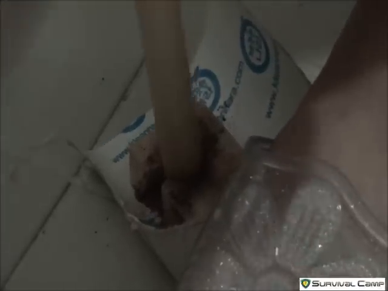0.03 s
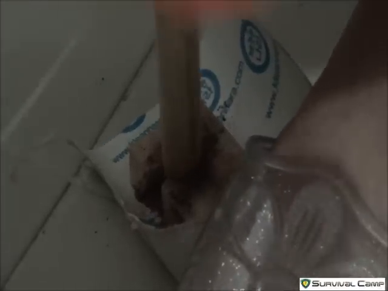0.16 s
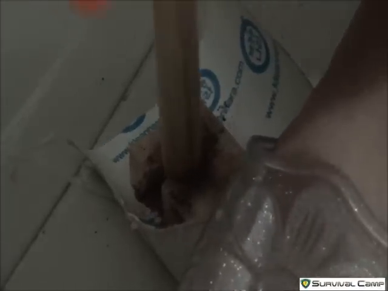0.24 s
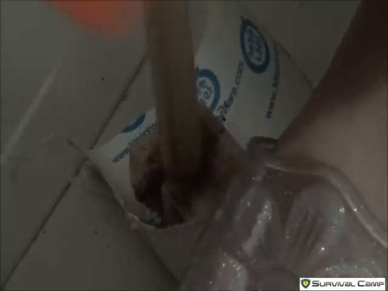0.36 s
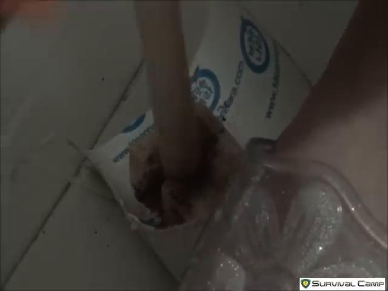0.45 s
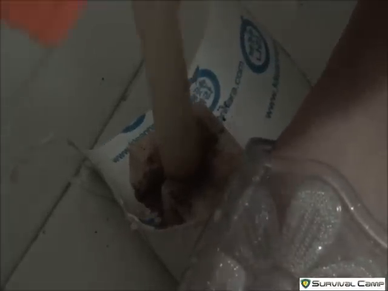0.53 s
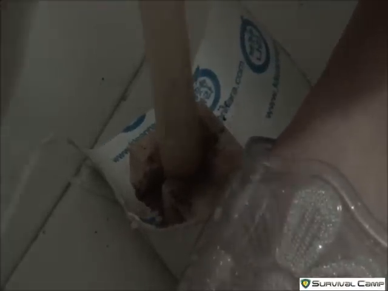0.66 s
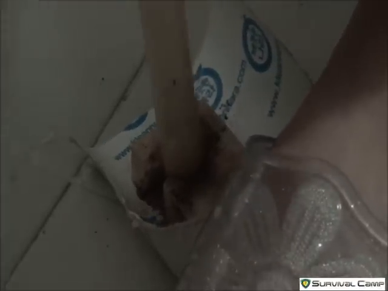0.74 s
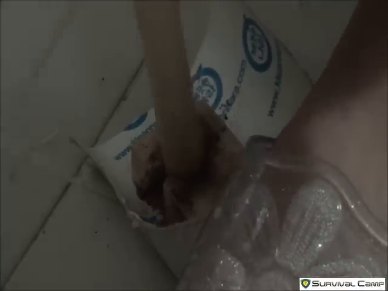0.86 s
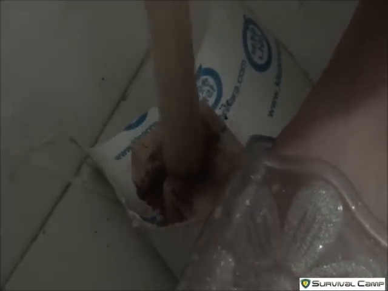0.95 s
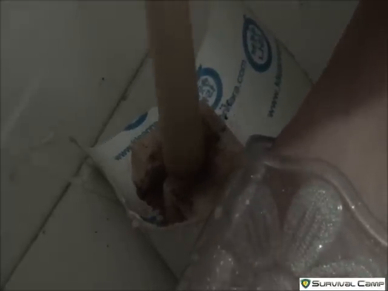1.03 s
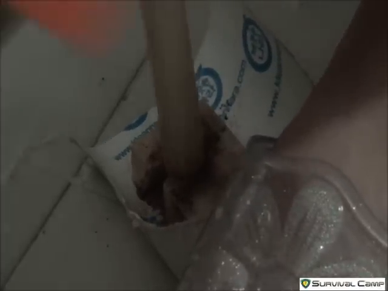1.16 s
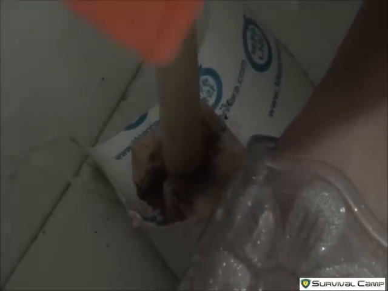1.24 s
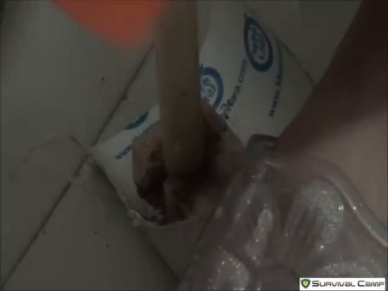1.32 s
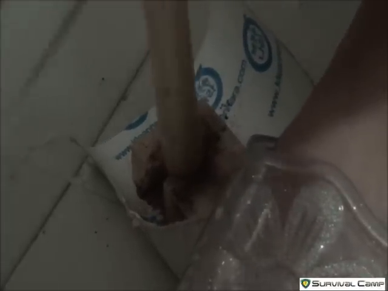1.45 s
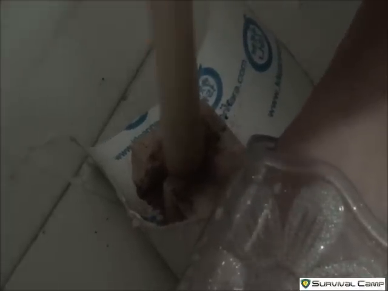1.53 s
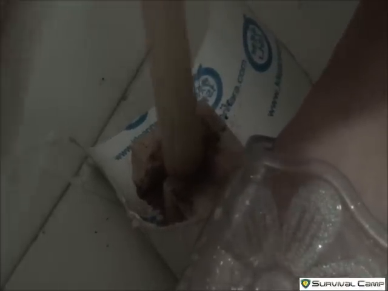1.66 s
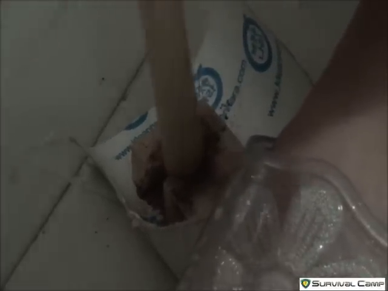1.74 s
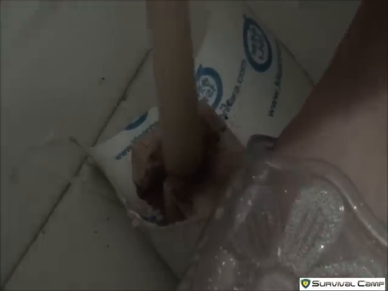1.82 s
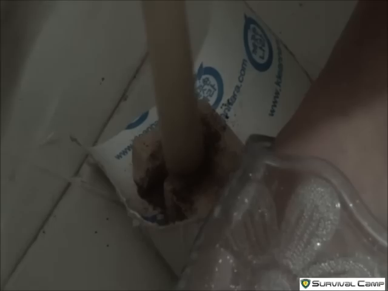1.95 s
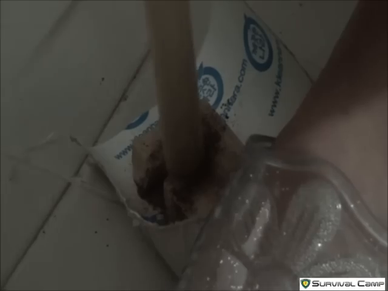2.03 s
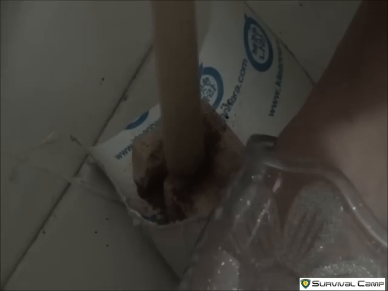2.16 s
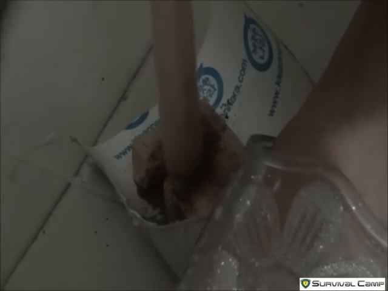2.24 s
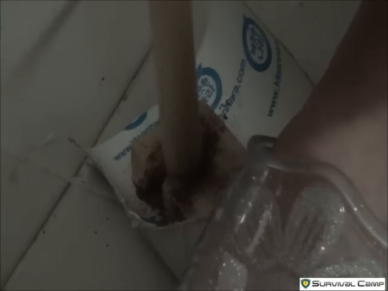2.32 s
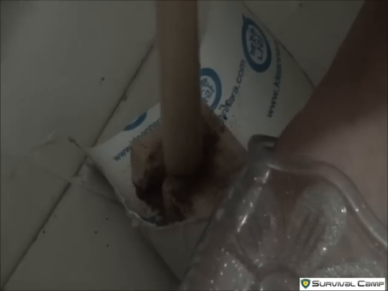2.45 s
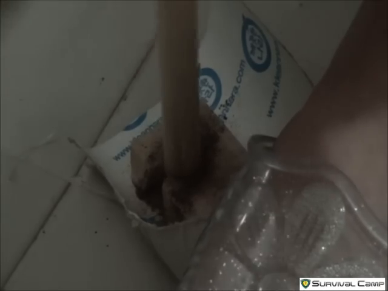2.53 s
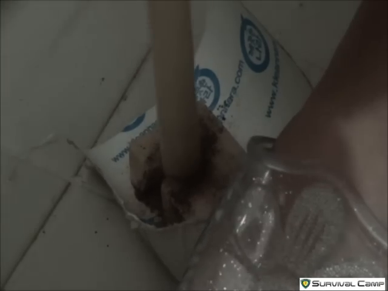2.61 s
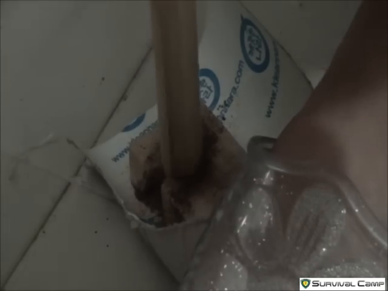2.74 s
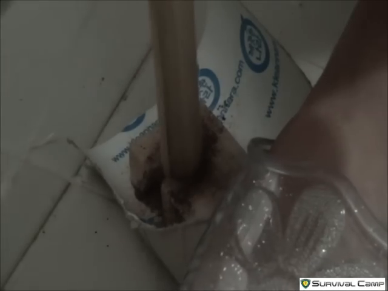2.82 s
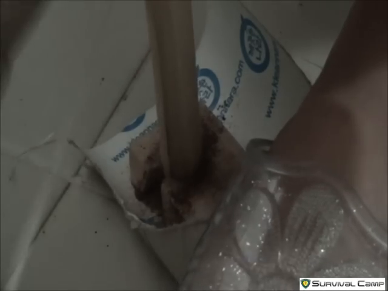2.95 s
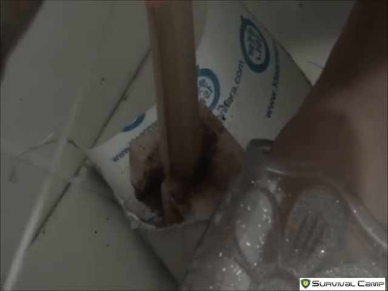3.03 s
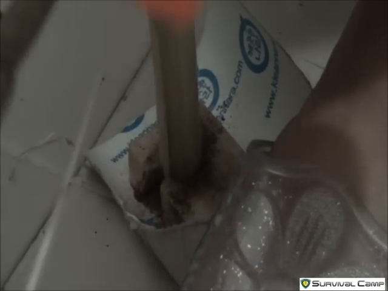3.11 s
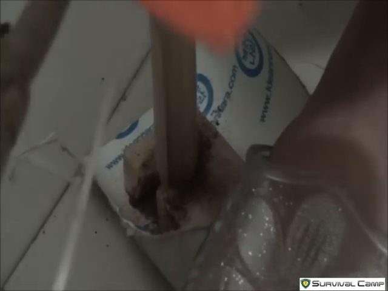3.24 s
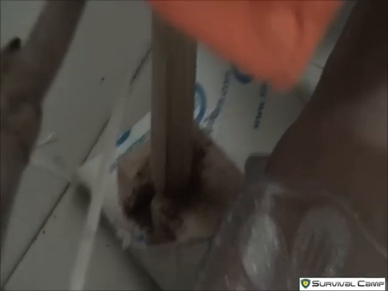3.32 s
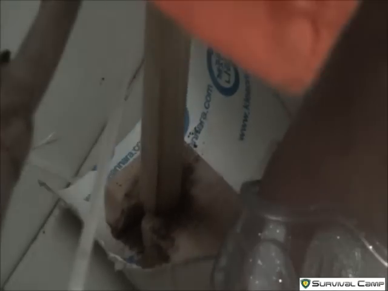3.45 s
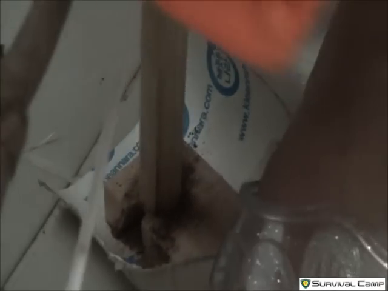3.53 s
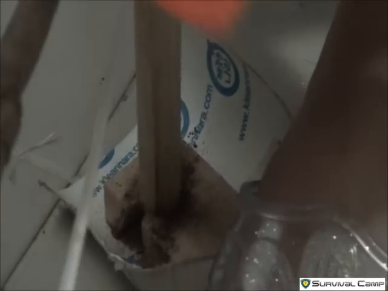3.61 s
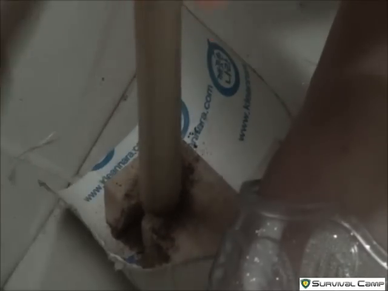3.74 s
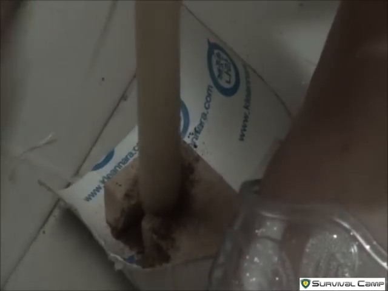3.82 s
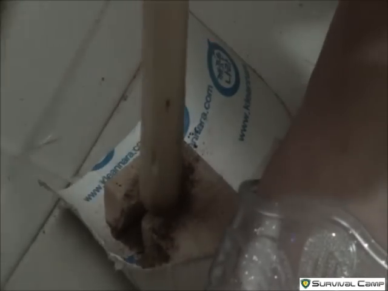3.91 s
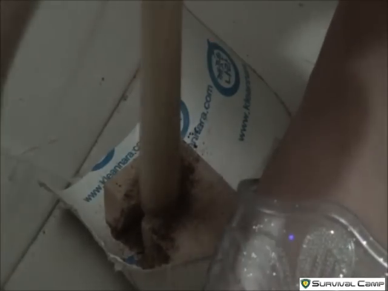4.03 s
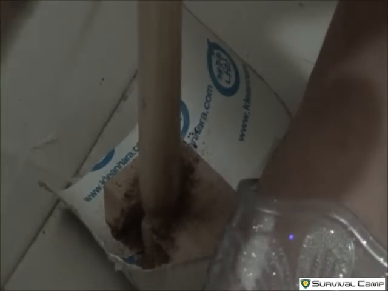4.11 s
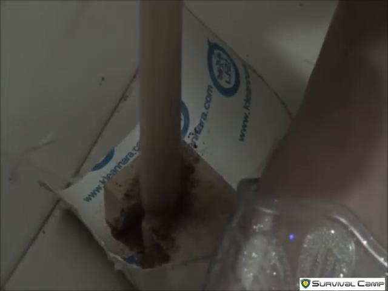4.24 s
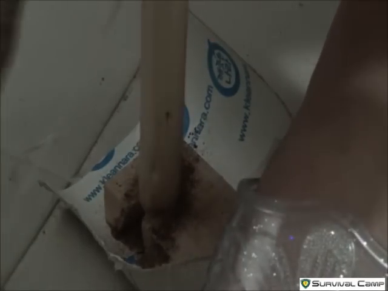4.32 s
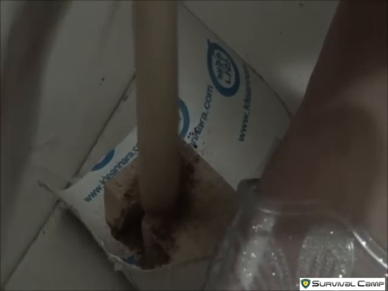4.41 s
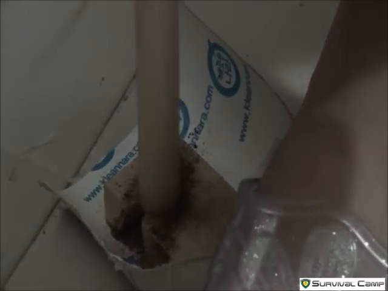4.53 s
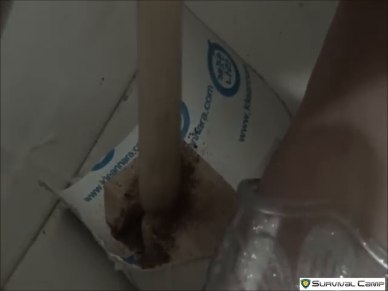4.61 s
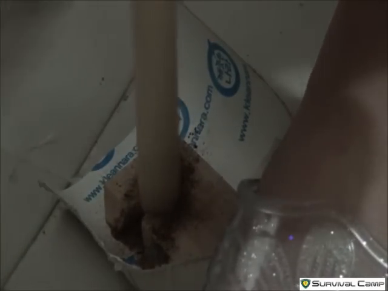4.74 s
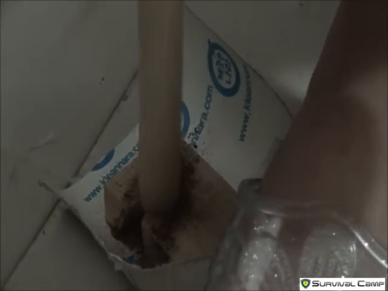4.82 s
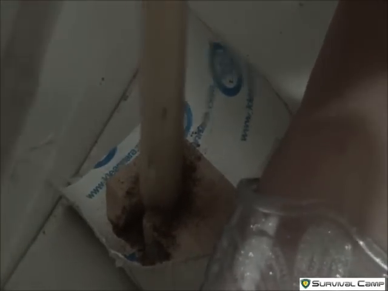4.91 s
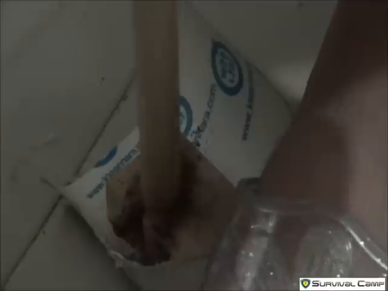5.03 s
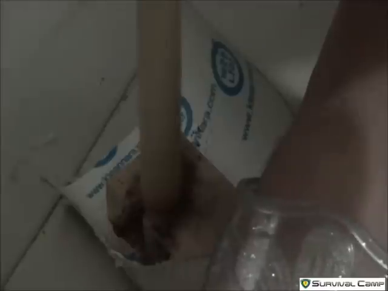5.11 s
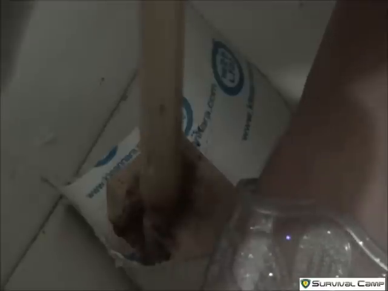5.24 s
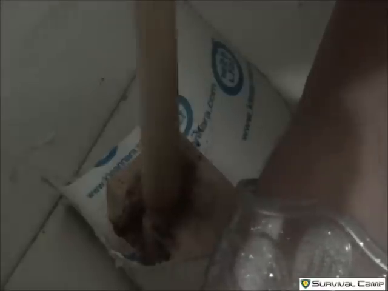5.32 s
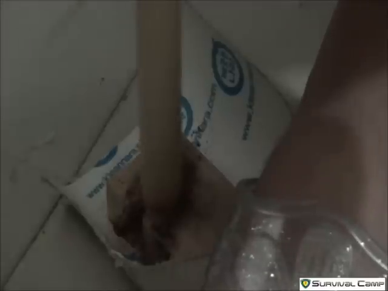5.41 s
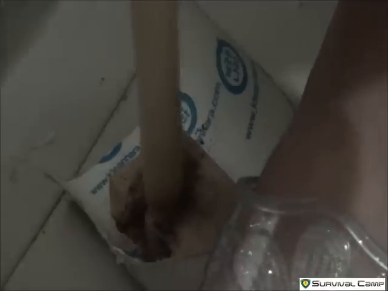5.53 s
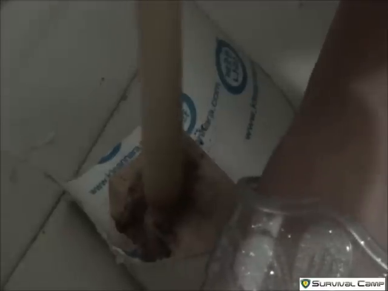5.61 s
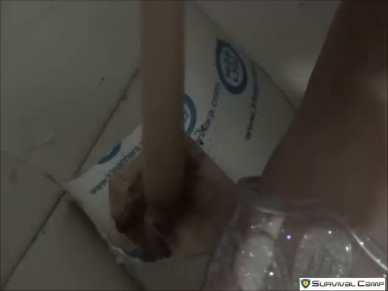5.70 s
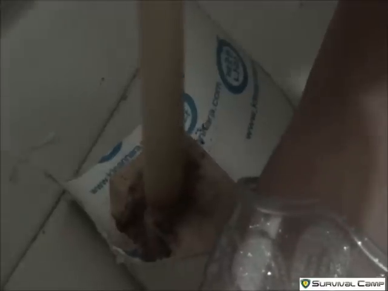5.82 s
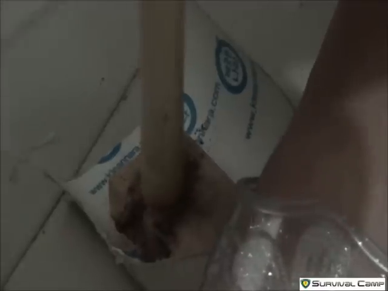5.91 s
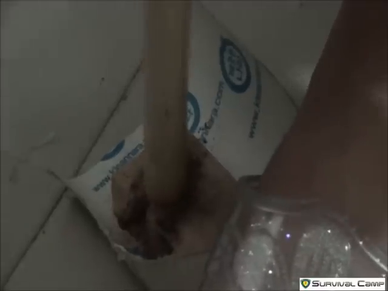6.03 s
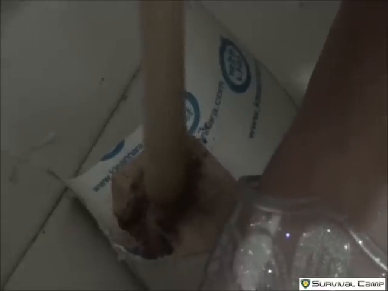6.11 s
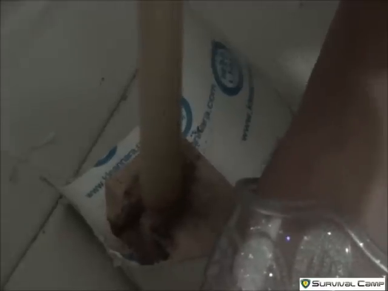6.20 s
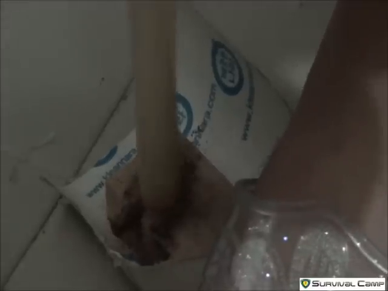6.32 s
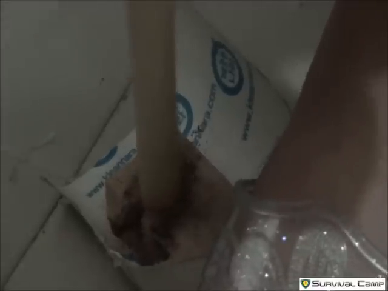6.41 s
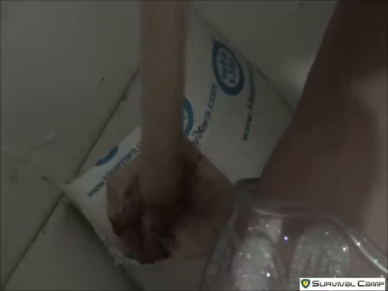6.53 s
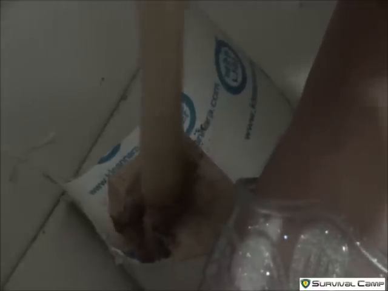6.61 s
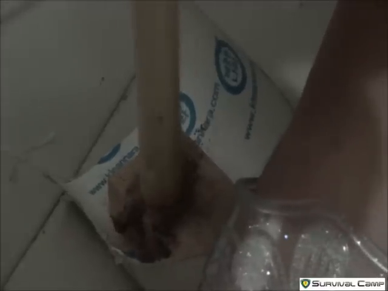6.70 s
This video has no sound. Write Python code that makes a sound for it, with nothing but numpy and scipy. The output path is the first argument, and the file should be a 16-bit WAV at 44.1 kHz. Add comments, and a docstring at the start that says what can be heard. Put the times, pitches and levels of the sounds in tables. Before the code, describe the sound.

Fast bow-drill friction, bright and squeaky-scratchy at first, with alternating push and pull strokes. After roughly a second's rest with faint taps, sharp cracks and a thud restart the sawing, now rougher and woodier, with stronger floor knocks toward the end. Recorded close in stereo, with short reflections from hard walls and faint steady room air.

```python
"""Gritty strokes rasp to and fro, about seven a second with a pause midway, over thuds, creaks and bright snaps.
A bow drill is sawn on a tiled floor: at each stroke the spindle spins up in its socket, rasps and stops.
Grain noise drives hiss, rasp and ringing; pushes ring the spindle harder than pulls, and the rasp grows coarser.
Noise and blows excite the hearth board's modes, gliding sines make the cord creak, noise bursts make the snaps.
A small hard room answers with early echoes and a decaying noise tail, over still air made of coloured noise."""
import sys
import numpy as np
from scipy import signal
from scipy.fft import rfft, irfft, next_fast_len
from scipy.io import wavfile
from scipy.ndimage import uniform_filter1d, map_coordinates

SR = 44100
rng = np.random.default_rng(int(sys.argv[2]) if len(sys.argv) > 2 else 0)


def store_pcm(level_fs):
    """Save levels as 16-bit WAV."""
    pcm = np.round(np.clip(level_fs, -1, 1) * 32767).astype(np.int16)
    wavfile.write(sys.argv[1], SR, np.atleast_2d(pcm).T)


N = 298116  # length in samples

# Levels in the tables are relative: each layer is balanced again in the mix.
# bow strokes: [start/s, end/s, level/dB, direction "push" or "pull"]
BOW_STROKES = [(-0.019, 0.069, -23, "push"), (0.214, 0.39, -40.5, "pull"), (0.399, 0.573, -25, "push"),
               (0.562, 0.721, -23, "pull"), (0.743, 0.892, -19.5, "push"), (0.873, 1.08, -23.5, "pull"),
               (1.06, 1.193, -22.5, "push"), (1.186, 1.362, -23, "pull"), (1.348, 1.504, -19.5, "push"),
               (1.473, 1.667, -20, "pull"), (1.657, 1.791, -19.5, "push"), (1.792, 1.95, -20.5, "pull"),
               (1.946, 2.07, -18, "push"), (2.07, 2.251, -22.5, "pull"), (2.236, 2.386, -20.5, "push"),
               (2.395, 2.534, -23.5, "pull"), (2.582, 2.715, -24.5, "push"), (3.11, 3.292, -52.5, "pull"),
               (3.269, 3.508, -44.5, "push"), (3.723, 3.948, -21.5, "pull"), (3.92, 4.11, -25, "push"),
               (4.21, 4.379, -24, "pull"), (4.357, 4.529, -20.5, "push"), (4.522, 4.694, -20.5, "pull"),
               (4.684, 4.812, -19.5, "push"), (4.804, 4.948, -19.5, "pull"), (4.949, 5.089, -19, "push"),
               (5.081, 5.211, -16.5, "pull"), (5.228, 5.364, -18.5, "push"), (5.356, 5.478, -18.5, "pull"),
               (5.51, 5.648, -20, "push"), (5.629, 5.77, -18, "pull"), (5.776, 5.912, -19, "push"),
               (5.895, 6.027, -17.5, "pull"), (6.055, 6.186, -18.5, "push"), (6.175, 6.323, -19, "pull"),
               (6.305, 6.473, -20.5, "push"), (6.466, 6.591, -18, "pull"), (6.597, 6.76, -22, "push")]
# how coarse the rasp is, how alike pushes and pulls ring, how much the board joins in: [t/s, coarseness/0-1]
COARSENESS = [(0, 0.02), (1.0, 0.07), (2.3, 0.62), (3.8, 0.84), (4.6, 0.72), (6.76, 0.97)]
# the board knocks on the floor, mostly late in a pull: [t/s, blow level/dB, level of rumble left behind/dB]
FLOOR_KNOCKS = [(0.692, -26, -52), (1.44, -25, -57), (1.586, -23.5, -50), (2.17, -26, -52),
                (2.498, -21, -57), (3.878, -12, -40), (4.325, -21, -45), (4.918, -16, -26),
                (5.17, -22, -44), (5.457, -14, -25.5), (5.747, -20, -22.5), (6.006, -9, -26.5),
                (6.346, -20.5, -45), (6.571, -8.5, -25)]
# resonances of the board when it knocks: [f/Hz, bandwidth/Hz, level/dB]
KNOCK_MODES = [(87, 5, -17), (168, 12, 0.5), (337, 120, -7), (480, 65, -1.5), (636, 91, 2), (789, 130, 1),
               (1410, 320, -10)]


def amp(db):
    """Decibels to gain."""
    return 10 ** (np.asarray(db) / 20)


def unit(x):
    """Scale to rms 1."""
    return x / np.sqrt(np.mean(x ** 2) + 1e-20)


def along(points, hz):
    """Read (Hz, value) points on a log frequency axis."""
    f, values = np.transpose(points)
    return np.interp(np.log(hz + 1), np.log(f + 1), values)


def wobble(rate):
    """A smooth random curve through `rate` random knots a second."""
    knots = rng.standard_normal(int(N * rate / SR) + 4)
    return map_coordinates(knots, [np.arange(N) * rate / SR])


def filtered(x, response):
    """Multiply the spectrum of x by a response given as a function of Hz."""
    m = next_fast_len(N + SR // 2)
    hz = np.fft.rfftfreq(m, 1 / SR)
    return irfft(rfft(x, m) * response(hz), m)[..., :N]


def coloured(x, spectrum):
    """Pass x through a smooth (Hz, dB) spectrum."""
    return filtered(x, lambda hz: amp(along(spectrum, hz)))


def rung(x, modes):
    """Ring a body's resonances with x; neighbouring modes swing in opposite senses."""
    def response(hz):
        total = 0
        for k, (centre, width, db) in enumerate(modes):
            damping = 1j * hz * width
            total = total + (-1) ** k * amp(db) * damping / (centre * centre - hz * hz + damping)
        return total
    return filtered(x, response)


def add(track, s, sound):
    """Mix a short sound into a track at time s."""
    part = track[max(round(s * SR), 0):][:len(sound)]
    part += sound[:len(part)]


def bursts(events, t60):
    """A noise burst for each (s, dB) row, falling 60 dB in t60 seconds."""
    out, t = np.zeros(N), np.arange(SR // 20) / SR
    for s, db, *_ in events:
        add(out, s, amp(db - 60 * t / t60) * rng.uniform(-1.12, 1, len(t)))
    return out


def arch(length):
    """Half a sine, rising and falling over length seconds."""
    return np.sin(np.linspace(0, np.pi, int(length * SR)))


def shudder(rise, t60):
    """An envelope that swells quickly and dies away; both times in seconds."""
    t = np.arange(SR) / SR
    return (1 - np.exp(-t / rise)) * amp(-60 * t / t60)


def coarseness_at(s):
    """Coarseness at time s, read between the table's points."""
    return np.interp(s, *np.transpose(COARSENESS))


def spread(pair, width, side_db):
    """Two unrelated signals become mid and side: a diffuse field at closely spaced microphones."""
    side = amp(side_db) * coloured(pair[1], width)
    return np.array([pair[0] + side, pair[0] - side])


def from_right(x, lag):
    """A sound from the right reaches the left microphone lag seconds later."""
    ears = np.array([[-1], [1]])
    return filtered(x, lambda hz: np.exp(1j * np.pi * hz * lag * ears))


def still_air():
    """Steady air noise, weighted to the lows and widest in the middle of the spectrum."""
    # colour of the air: [f/Hz, level/dB]
    air_colour = [(20, -17), (35, -4), (55, -9.5), (140, -16.5), (215, -4), (290, -0.5), (350, -7.5),
                  (400, -11.5), (700, -6.5), (1100, -10), (1600, -15), (2600, -24.5), (5000, -29),
                  (15500, -35.5)]
    # stereo width of the air: [f/Hz, side minus mid/dB]
    air_width = [(60, -36), (250, -25), (1600, -9.5), (5000, -5), (15000, -29.5)]
    noise = unit(coloured(rng.standard_normal((2, N)), air_colour))
    return amp(-46.5) * spread(noise, air_width, side_db=-1.5)


def room(x, early_db, tail_db, side_db, early_t60=0.019, count=20):
    """Floor and nearby things answer at once; the walls ring on, their paths changing as the arm moves."""
    # decay of the walls: [f/Hz, t60/s]
    wall_decay = [(100, 0.22), (700, 1.03), (4000, 0.81), (9000, 0.33), (15000, 0.47)]
    # stereo width of the echoes: [f/Hz, side minus mid/dB]
    echo_width = [(60, -16), (250, -6), (600, -6), (2500, -7), (5000, -5), (8000, -8.5), (10500, -24),
                  (13000, -41)]
    t = np.arange(SR // 10) / SR
    early = rng.standard_normal((2, SR // 10)) * amp(-60 * t / early_t60)
    early /= np.linalg.norm(early[0])
    x = np.pad(x, (SR // 500, 0))  # echoes start 2 ms late
    wet = amp(early_db) * signal.fftconvolve(x[None], early, axes=1)[:, :N]
    # overlapping pieces of the sound each meet a fresh tail
    hop = N // count
    padded = np.pad(x, (hop, 2 * hop))
    for start in range(-hop, N, hop):
        piece = padded[start + hop:][:2 * hop] * np.hanning(2 * hop)
        hz, t, z = signal.stft(rng.standard_normal((2, SR // 2)), SR, nperseg=256)
        decay = amp(-60 * t / along(wall_decay, hz)[:, None])
        tail = signal.istft(z * decay, SR, nperseg=256)[1]
        for track, walls in zip(wet, tail):
            answer = signal.fftconvolve(piece, walls / np.linalg.norm(walls))
            add(track, start / SR, amp(tail_db) * answer[max(-start, 0):])
    return spread(wet, echo_width, side_db)


def creaks(rough=0.1):
    """The loaded cord slips at an uneven, gliding rate: sines with a jittered pitch and level."""
    # creaks of the cord: [t/s, length/s, start f/Hz, end f/Hz, level/dB]
    cord_creaks = [(1.72, .16, 940, 820, -38), (4.31, .16, 880, 1020, -41), (4.812, .09, 1080, 770, -32),
                   (5.068, .07, 800, 790, -33.5)]
    out, unsteady = np.zeros(N), 1 + rough * wobble(400)
    for s, length, start_hz, end_hz, db in cord_creaks:
        u = np.linspace(0, 1, int(length * SR))
        glide = start_hz + (end_hz - start_hz) * u
        rate = glide * unsteady[int(s * SR):][:len(u)]
        tone = np.sin(2 * np.pi * np.cumsum(rate) / SR)
        add(out, s, amp(db + 1.5) * np.sin(np.pi * u) * tone)
    return out * unit(amp(6.7 * wobble(250)))


def snaps():
    """Cord and splinters crack bright and dry; the loose bow taps the spindle more dully."""
    # snaps of cord and splinters: [t/s, level/dB]
    crack_times = [(0.8301, -14), (2.7, -17), (3.338, -28), (3.418, -18.5), (3.879, -6), (4.2097, -6),
                   (4.2127, -6), (4.3438, -9.5), (6.345, -6)]
    # taps of the bow while the hands rest: [t/s, level/dB]
    bow_taps = [(2.863, -32.5), (2.878, -59.5), (3.333, -26.5), (3.643, -39), (3.656, -38)]
    crack_colour = [(300, -25), (2000, -11), (6500, -2.0), (10000, 1.5), (13000, -21)]
    tap_colour = [(200, -5), (1000, 6), (3000, -1), (6000, -6.5), (13000, -17)]
    cracks = coloured(bursts(crack_times, t60=0.0046), crack_colour)
    taps = coloured(bursts(bow_taps, t60=0.045), tap_colour)
    return amp(5.5) * cracks + amp(6.0) * taps


def rattle(lumpy_db=4):
    """After each knock the board chatters unevenly on the floor, in the same damped modes."""
    strength = np.zeros(N)
    for s, db, _ in FLOOR_KNOCKS:
        add(strength, s, amp(db - 13) * shudder(rise=0.0064, t60=0.26))
    contacts = rng.standard_normal(N) * amp(lumpy_db * np.tanh(wobble(150)))
    chatter = coloured(contacts, [(80, -8), (220, 4), (900, -1), (2500, -2)])
    return strength * unit(rung(chatter, KNOCK_MODES))


def knocks(contact=0.00039):
    """Blows of the board on the floor: a push of brief contact (s) rings damped low modes under a dry clack."""
    blows, u = np.zeros(N), np.arange(SR // 50) / SR / contact
    push = u * np.exp(-2 * u)
    for s, db, _ in FLOOR_KNOCKS:
        add(blows, s, amp(db + 32.5) * push / push.sum())
    clack_colour = [(100, -18), (400, 4.5), (850, 0), (1700, -2.0), (3000, -15), (9000, -45)]
    clack = coloured(bursts(FLOOR_KNOCKS, t60=0.042), clack_colour)
    return rung(blows, KNOCK_MODES) + amp(10) * clack


def shaking():
    """Strength of the board's rumble and body: follows the strokes, rocks at times, settles after knocks."""
    # the board rocks softly on the floor: [t/s, length/s, level/dB]
    soft_rocks = [(.66, 0.1, -46), (1.06, 0.1, -40), (1.26, 0.12, -48), (1.435, .08, -50),
                  (1.582, 0.059, -44), (1.76, 0.11, -35), (1.857, 0.14, -38.5), (2.15, 0.15, -46),
                  (2.327, 0.086, -44), (4.28, .18, -40.5), (5.14, 0.1, -44), (5.6, 0.086, -48),
                  (6.252, 0.13, -36)]
    lag_s = 0.036  # the board shakes a little after the spindle
    rumble_db, rumble_coarse_db = -28, 3  # low rumble against the stroke, and its gain at coarseness 1
    body_db, body_coarse_db = -16.5, 2  # the same for the woody body
    rumble, body = np.zeros((2, N))
    for start, end, db, _ in BOW_STROKES:
        coarse, shape = coarseness_at(start), arch(end - start)
        add(rumble, start + lag_s, amp(db + rumble_db + rumble_coarse_db * coarse) * shape)
        add(body, start + lag_s, amp(db + body_db + body_coarse_db * coarse) * shape)
    for s, length, db in soft_rocks:
        add(rumble, s, amp(db) * arch(length))
    for s, _, left_db in FLOOR_KNOCKS:
        add(rumble, s, amp(left_db) * shudder(rise=0.02, t60=0.34))
    return rumble, body


def board():
    """The wobbling spindle shakes the hearth board on the floor: smooth noise for rumble, lumpy for body."""
    # low rumble and woody body resonances: [f/Hz, bandwidth/Hz, level/dB]
    low_modes = [(85, 10, 0), (154.5, 10, -1), (218, 40, -11.5)]
    body_modes = [(227, 49, -10.5), (340, 27, -5.5), (418, 44, -4), (647.5, 42, 3.5), (780, 74, -4.5),
                  (910, 360, -9)]
    rumble, body = shaking()
    rocking = coloured(rng.standard_normal(N), [(30, -7), (62, -8), (80, -1), (250, 0), (700, -15)])
    judder = rng.standard_normal(N) * amp(7.9 * np.tanh(wobble(120)))
    chatter = coloured(judder, [(60, -20), (200, -3.5), (1000, -10), (3000, 9), (9000, -40)])
    return rumble * unit(rung(rocking, low_modes)) + amp(-3.5) * body * unit(rung(chatter, body_modes))


def grit(spiky_db):
    """Countless tiny fractures of unequal size, up to the size of one fibre: noise with a bounded random level."""
    return unit(rng.standard_normal(N) * amp(spiky_db * np.tanh(wobble(3000))))


def bowing(steepness):
    """Strength of hiss, rasp, bite and edge: each stroke speeds up, peaks and stops."""
    fastest_share = 0.59  # how far through a stroke the spindle turns fastest
    firm_db = -19.5  # level of an ordinary firm stroke
    rasp_mild_db, rasp_coarse_db, rasp_grows = -5.5, 8, 0.73  # at coarseness 0, gain at 1, dB per stroke dB
    bite_mean_db, bite_grows = -1, 1.75  # spindle ring: mean, dB per stroke dB
    bite_push_db, bite_eases = 6, 0.55  # gain on a push (loss on a pull), share of it lost at coarseness 1
    edge_mean_db, edge_push_db = 2, -0.2  # rim ring: mean, change on a push (opposite on a pull)
    scatter_db = 2.17  # no two strokes bear on quite the same spot
    t = np.arange(N) / SR
    drive = np.zeros((4, N))
    for start, end, db, direction in BOW_STROKES:
        span = slice(max(int(start * SR), 0), int(end * SR))
        peak = start + fastest_share * (end - start)
        phase = np.interp(t[span], [start, peak, end], [0, 1, 2])
        speed = np.abs(np.sin(np.pi / 2 * phase))
        coarse = coarseness_at(start)
        sense = 1 if direction == "push" else -1
        above_firm = db - firm_db
        rasp_db = firm_db + rasp_grows * above_firm + rasp_mild_db + rasp_coarse_db * coarse
        push_db = sense * bite_push_db * (1 - bite_eases * coarse)
        bite_db = firm_db + bite_grows * above_firm + bite_mean_db + push_db
        edge_db = db + edge_mean_db + sense * edge_push_db
        voices_db = np.array([rasp_db, bite_db, edge_db]) + scatter_db * rng.standard_normal(3)
        levels = np.r_[db, voices_db]
        drive[:, span] += amp(levels)[:, None] * speed ** steepness
    return drive


def catching():
    """Extra friction as the spindle catches: a sudden grab that lets go gradually."""
    # moments of harder scraping: [t/s, length/s, level/dB]
    catches = [(0.423, .04, -30), (0.477, .022, -19), (0.643, .012, -22), (1.086, .03, -26),
               (1.122, .02, -22), (1.153, .012, -22), (2.299, .025, -18), (3.829, .03, -20),
               (4.117, .03, -25), (4.701, .03, -19.5), (4.843, .03, -21), (5.396, .02, -21),
               (5.558, .02, -22)]
    grab = np.zeros(N)
    for s, length, db in catches:
        u = np.linspace(0, 1, int(length * SR))
        add(grab, s, amp(db) * np.tanh(20 * u) * np.cos(np.pi / 2 * u))
    return grab


def shifting(x, patchy_db):
    """The contact point wanders round the socket, so the colour shifts from moment to moment."""
    z = signal.stft(x, nperseg=512)[2]
    field = uniform_filter1d(rng.standard_normal(z.shape), size=4, axis=0)  # smooth over frequency
    field = uniform_filter1d(field, size=12, axis=1)  # and over time
    return signal.istft(z * amp(patchy_db * unit(field)), nperseg=512)[1][:N]


def socket():
    """One shared unsteadiness roughens all four voices; catches add extra dust hiss and spindle ring."""
    # colour of charred dust, and of coarse wood fibres: [f/Hz, level/dB]
    dust_colour = [(1000, -34), (2500, -14.5), (4000, -7), (5300, -3.5), (7700, -1.5), (8500, -2.5),
                   (9400, 1.5), (10100, -1.5), (11000, -5), (12300, -11.5), (13700, -12.5), (15500, -10.5)]
    fibre_colour = [(100, -19), (250, -1), (450, -12.5), (650, -5.5), (1050, -4.5), (1800, -1.5),
                    (2250, 2.5), (3000, 4.5), (3400, 0.5), (5500, -3.5), (9000, -26)]
    # resonances of the spindle, and of the socket's rim: [f/Hz, bandwidth/Hz, level/dB]
    spindle_modes = [(3710, 88, -1), (4090, 160, -1.5), (4320, 236, -1.5), (5230, 190, -5.5)]
    rim_modes = [(6194, 280, -0.5), (6590, 210, -1), (6805, 400, 0), (7780, 230, -4), (9900, 610, -2.5)]
    hiss, rasp, bite, edge = bowing(steepness=1.42)
    grab = catching()
    # slow and fast unsteadiness shared by every voice
    grip = unit(amp(1.58 * np.tanh(wobble(75)) + 2.1 * np.tanh(wobble(400))))
    dust = (amp(-3) * hiss + grab / 2) * unit(coloured(grip * grit(spiky_db=2.5), dust_colour))
    fibres = amp(-10.5) * rasp * unit(coloured(grip * grit(spiky_db=5.5), fibre_colour))
    spindle = amp(-13.0) * (bite + grab) * unit(rung(grip * grit(spiky_db=9.0), spindle_modes))
    rim = amp(-8.5) * edge * unit(rung(grip * grit(spiky_db=3.0), rim_modes))
    return shifting(dust + fibres + spindle + rim, patchy_db=2.0)


def scene():
    """The still air, the board and cord slightly to the right, and the drill close by, each with its room."""
    air = still_air()
    thumping = board() + knocks() + rattle() + creaks()
    thumping_room = room(thumping, early_db=-7.5, tail_db=-4.5, side_db=-5)
    low = amp(-2.5) * (from_right(thumping, lag=0.000076) + thumping_room)
    rubbing = socket() + snaps()
    near = amp(-1.5) * (rubbing + room(rubbing, early_db=-9.0, tail_db=-6.0, side_db=-3.5))
    return near + low + air


def record(dry):
    """A band limit: the treble fades out over 300 Hz around 15850 Hz."""
    return filtered(dry, lambda hz: np.clip((15850 - hz) / 300 + .5, 0, 1))


dry = scene()
out = record(dry)
store_pcm(out)
```